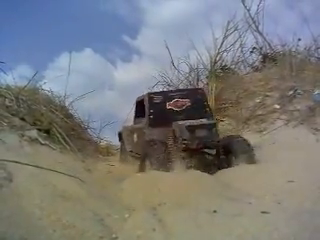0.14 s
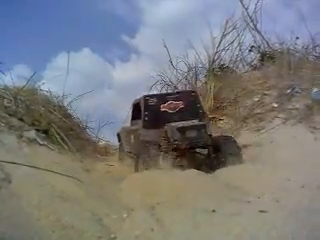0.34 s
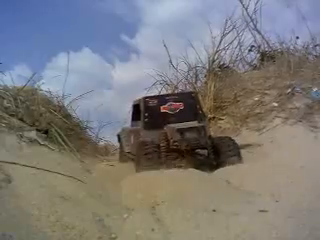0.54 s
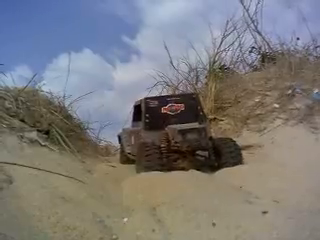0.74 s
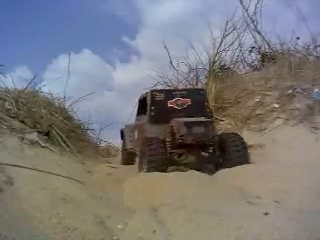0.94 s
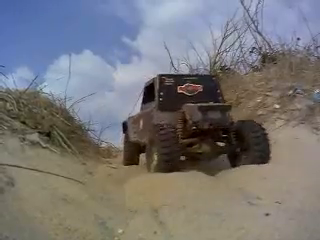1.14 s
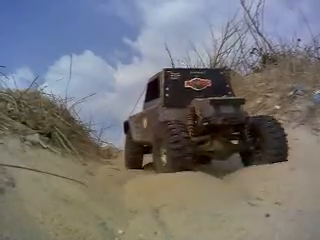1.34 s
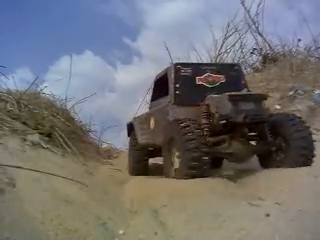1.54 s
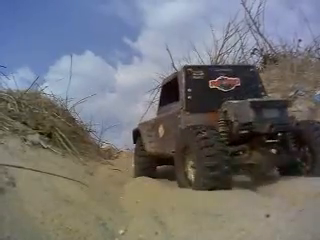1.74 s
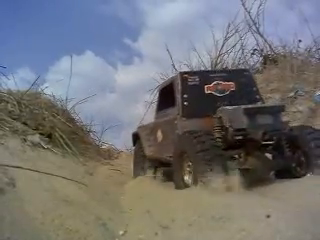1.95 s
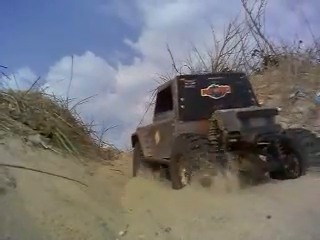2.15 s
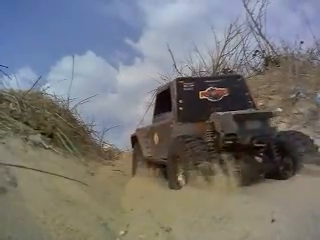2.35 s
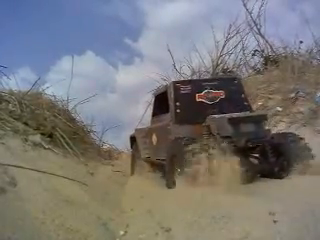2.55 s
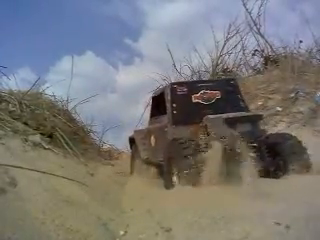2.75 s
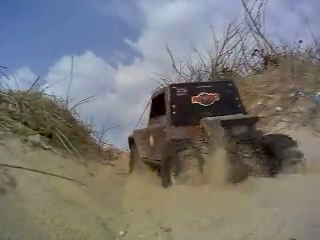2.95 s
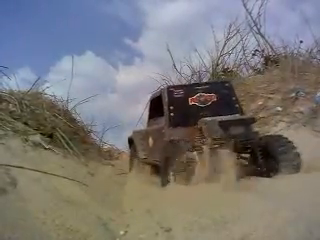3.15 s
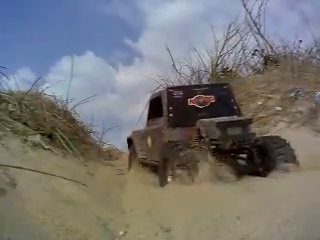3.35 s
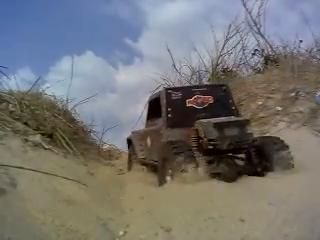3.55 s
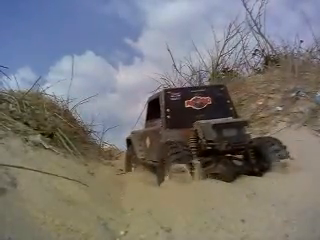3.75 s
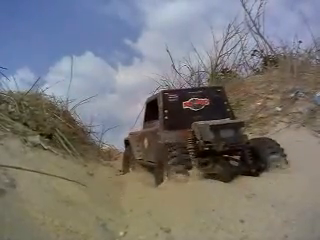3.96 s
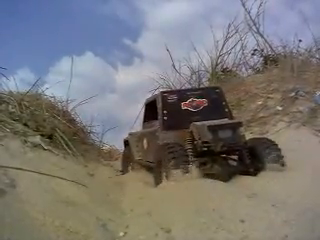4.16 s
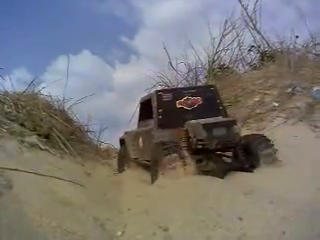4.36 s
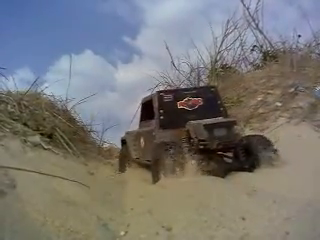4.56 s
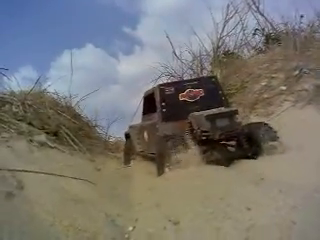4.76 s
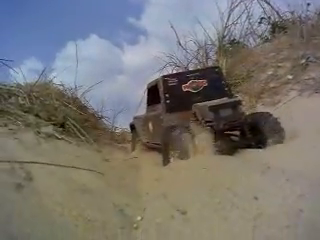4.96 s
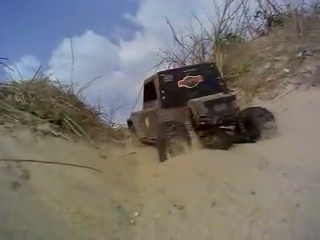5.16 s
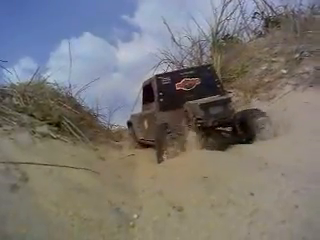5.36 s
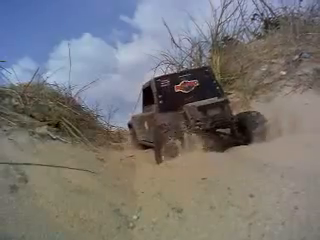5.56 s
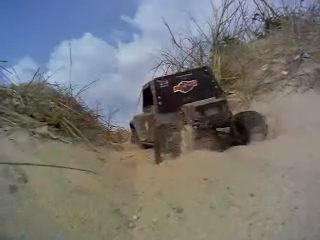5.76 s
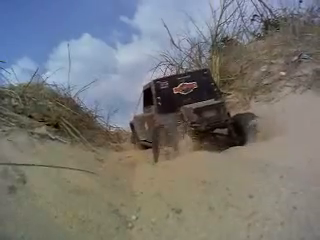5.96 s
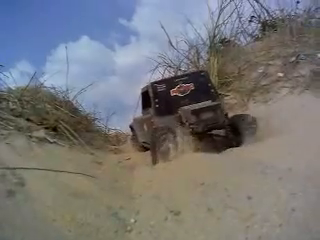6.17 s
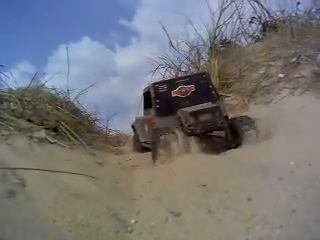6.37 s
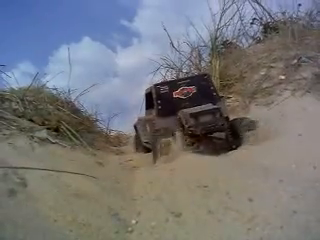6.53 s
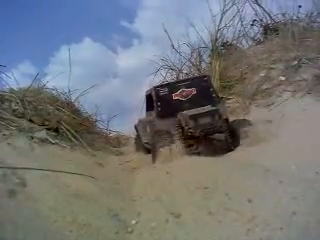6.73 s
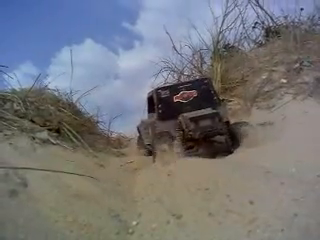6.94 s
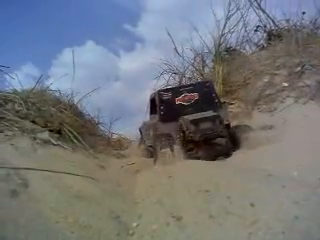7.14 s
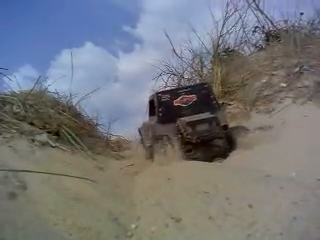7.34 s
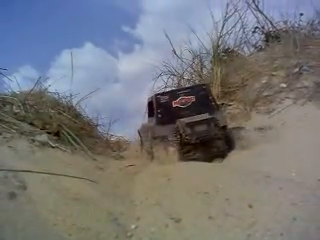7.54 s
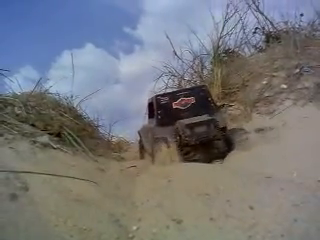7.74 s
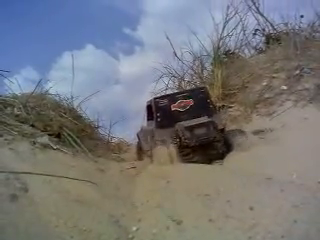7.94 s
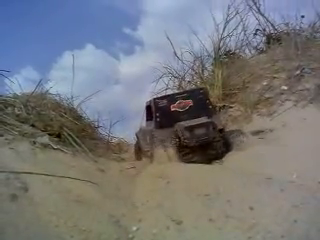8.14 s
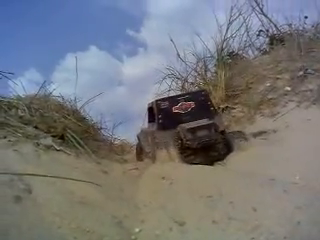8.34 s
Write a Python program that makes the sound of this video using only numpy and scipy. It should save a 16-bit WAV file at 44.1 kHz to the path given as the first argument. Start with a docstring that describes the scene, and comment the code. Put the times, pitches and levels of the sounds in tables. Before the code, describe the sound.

Close by on a breezy sand dune, a toy truck's electric motor revs up sharply and winds down. After a lull with short nudges, it settles into a raspy, rapidly pulsing whine as the tyres dig in and fling sand. The pitch sags under load and recovers, with gear teeth clattering at the strongest surges. Occasional small knocks and low wind puffs on the microphone come through.

```python
"""Toy truck climbing a dune

A small electric radio-controlled truck lunges, creeps, then digs in with spinning tyres, close to a
microphone in a sea breeze. Its drive-shaft joints make the gear whine warble about twelve times a
second. Gear teeth rattle in the plastic body and skip at the top of the widest surges. Sand sprays."""
import sys
import numpy as np
from scipy import signal
from scipy.fft import rfft, irfft
from scipy.io import wavfile
from scipy.ndimage import uniform_filter1d

SR = 44100
rng = np.random.default_rng(int(sys.argv[2]) if len(sys.argv) > 2 else 0)


def store_wav(level_fs):
    """Save 16-bit WAV to argv[1]."""
    pcm = np.round(np.clip(np.atleast_2d(level_fs), -1, 1) * 32767)
    wavfile.write(sys.argv[1], SR, pcm.T.astype(np.int16))


N = 374850
TIME = np.arange(N) / SR

# The "mesh rate" is how many gear teeth meet each second: it sets the pitch of the whine.
CREEP_HZ, BOGGED_HZ, CRUISE_HZ = 740, 1000, 1300
WIDE_SWING = .12  # beyond this speed swing (share of the mean) the wound-up shaft springs back

# where the gearbox and plastic body ring: (pitch [Hz], width [Hz], level [dB])
BODY_RESONANCES = [(375.4, 120, -6), (723, 160, -3), (958, 186, -1.5), (1090, 122, -5.5), (1330, 250, -9),
                   (1750, 380, -13), (2125, 140, -10), (2697, 570, -8.5), (3170, 180, -8),
                   (3620, 1300, -10.5), (4180, 770, -14), (5170, 1000, -9)]
# the tone of sand hitting tyres and body: (frequency [Hz], relative level [dB])
SAND_SPECTRUM = [(300, -9), (650, 3), (900, 6), (1480, -4), (1750, 1), (2400, -2.5), (2700, -0.5),
                 (2950, -4), (3250, 2.5), (4100, -0.5), (4750, -7.5), (5300, -5), (6300, -13), (7300, -23)]
# spinning wheels: (time [s], mean mesh rate [Hz], speed swing from the joints [share of the mean])
WHEELSPIN = [(1.92, 606, 0.03), (2.08, 1172, 0.082), (2.3, 1245, 0.088), (2.55, 1323, 0.09),
             (2.75, 1442, 0.18), (3.15, 1300, 0.22), (3.45, 1320, 0.15), (3.58, 1091, 0.01),
             (3.7, 975, 0.1), (4.1, 1025, 0.073), (4.43, 1006, 0.097), (4.58, 1204, 0.114),
             (4.76, 1227, 0.016), (4.92, 1259, 0.167), (5.1, 1252, 0.082), (5.26, 1300, 0.016),
             (5.45, 1376, 0.175), (5.75, 1290, 0.24), (6.45, 1393, 0.18), (6.75, 1311, 0.14),
             (7.2, 1306, 0.135), (7.7, 1358, 0.115), (8.5, 1305, 0.125)]
# dabs of throttle while creeping: (start [s], length [s], peak mesh rate [Hz], level [dB])
THROTTLE_DABS = [(0.974, .105, 1082, 3), (1.03, .25, 879.7, -3), (1.536, .1, 950, -9)]


def undb(db):
    """Turn decibels into a gain."""
    return 10 ** (np.asarray(db) / 20)


def unit(x):
    """Scale a signal to an average (rms) level of 1."""
    return x / np.sqrt(np.mean(x ** 2))


def curves(table):
    """Join a table's timed rows with straight lines: one curve for each later column."""
    times, *columns = np.transpose(table)
    return [np.interp(TIME, times, column) for column in columns]


def swells(rows):
    """A decibel curve of bell-shaped rises and dips."""
    return sum(db * np.exp(-((TIME - s) / half_s) ** 2) for s, half_s, db in rows)


def wander(rate):
    """A smooth random wobble of size about 1, changing about `rate` times a second."""
    span = max(int(SR / rate), 2)
    smoothed = uniform_filter1d(rng.standard_normal(N), span, mode="wrap")
    return unit(uniform_filter1d(smoothed, span // 2, mode="wrap"))


def colour(x, points):
    """Shape a sound's tone by (frequency [Hz], level [dB]) points, then scale it to level 1."""
    hz, db = np.transpose(points)
    freqs = np.maximum(np.arange(N // 2 + 1) * SR / N, 1)
    gain = undb(np.interp(np.log(freqs), np.log(hz), db))
    return unit(irfft(rfft(x) * gain, N))


def ring(x, resonances):
    """Pass a sound through resonances: (pitch [Hz], width [Hz], level [dB])."""
    freqs = np.arange(N // 2 + 1) * SR / N
    power = sum((undb(db) / (1 + (2 * (freqs - hz) / width) ** 2)) ** 2 for hz, width, db in resonances)
    return irfft(rfft(x) * np.sqrt(power), N)


def grains(per_second, spread_db):
    """Tiny impacts at random times; a larger spread makes their sizes more unequal."""
    hits = rng.random(N) < per_second / SR
    return hits * rng.standard_normal(N) * undb(spread_db * rng.standard_normal(N))


def wind(level_db=-40, buffet_db=1.58):
    """Swirls of air buffet the microphone, with a few stronger puffs."""
    # the tone of wind on the microphone: (frequency [Hz], relative level [dB])
    spectrum = [(15, -9), (30, -2), (55, 3), (80, 1), (120, -2), (170, -4.5), (250, -11.5), (370, -16.5),
                (500, -21.5), (800, -24), (1500, -29.5), (3300, -33), (4500, -43), (7300, -50.5)]
    # the strongest gusts, and a lull: (time [s], half length [s], level change [dB])
    puffs = [(1.05, 0.041, 2.5), (1.45, 0.29, -1), (1.94, 0.021, 6), (2.15, 0.097, 5.5), (3.51, 0.037, 7.5),
             (4.1, 0.17, 4), (4.91, 0.033, 6.5), (5.3, 0.085, 4), (5.56, 0.056, 5), (6.27, 0.032, 9),
             (6.9, 0.13, 3.5), (7.38, 0.029, 3.5), (8.4, .035, 6)]
    rush = colour(rng.standard_normal(N), spectrum)
    return rush * undb(level_db + swells(puffs) + buffet_db * wander(10))


def knocks(rise_s=.0019, decay_s=.0071):
    """Grit and loose links knock in short bursts that partly ring the body."""
    # knocks on the truck: (time [s], peak level [dB], share that rings the body [0-1])
    strikes = [(.38, -33, .8), (.428, -31.5, .95), (.485, -35, .7), (.948, -52, .5), (1.04, -44, .8),
               (1.066, -44, .85), (1.548, -53, .35), (1.789, -49, .1), (2.429, -40, .6), (2.759, -38, .45),
               (3.351, -42, .6), (4.913, -43, .5), (5.67, -43, .6), (6.274, -41, .7), (6.789, -43, .6)]
    ringing, plain = np.zeros((2, N))
    for s, db, share in strikes:
        age = TIME - s
        burst = undb(db) * np.clip(age / rise_s, 0, 1) * np.exp(-np.abs(age) / decay_s)
        ringing += share * burst
        plain += (1 - share) * burst
    noise = rng.standard_normal(N)
    crunch = colour(noise, [(400, -2), (1500, -1), (3000, -5), (5000, 0), (7300, -7)])
    return ringing * unit(ring(noise, BODY_RESONANCES)) + plain * crunch


def tyres(octaves, level_db=-49, dig_db_per_s=.09):
    """Rubber treads churn the sand with a low rumble that grows as they dig deeper."""
    spectrum = [(60, -16), (150, 4.5), (260, 1), (380, -4.5), (520, -5.5), (900, -36.5), (3000, -61.5)]
    rumble = colour(grains(600, spread_db=0), spectrum)
    return rumble * undb(level_db + octaves + dig_db_per_s * TIME)  # 1 dB more per doubling of speed


def sand_hiss(joint, throb_db=.26, flutter_db=1.5, lag_rad=1):
    """Treads fling grit and fine sand in spurts that follow the wheels' surges."""
    grit = unit(grains(7000, spread_db=2.2))
    hiss = undb(-3) * rng.standard_normal(N)
    fling = np.cos(joint - lag_rad) + .5 * np.cos(2 * (joint - lag_rad))
    return colour(grit + hiss, SAND_SPECTRUM) * undb(throb_db * fling + flutter_db * wander(60))


def sand_ticks(joint, per_second=200, volley_db=4, lag_rad=1.1):
    """Coarse grains hit the body in a volley just after each surge."""
    hits = (rng.random(N) < per_second / SR) * undb(2 * rng.standard_normal(N))
    ticks = colour(hits, [(100, -25), (700, -4), (1500, 0), (4000, 0), (5500, -7), (7300, -20)])
    return ticks * undb(volley_db * np.cos(joint - lag_rad))


def sand_spray(joint, octaves, db_per_octave=8.5):
    """Faster treads throw sand harder, so its hiss and ticks grow together."""
    # the treads reach patches of loose sand: (time [s], half length [s], level change [dB])
    patches = [(.25, 0.084, 1), (2.7, 0.15, -0.3), (5.33, 0.075, 3.5)]
    spray = undb(-48) * sand_hiss(joint) + undb(-60) * sand_ticks(joint)
    return spray * undb(db_per_octave * octaves + swells(patches))


def press(start, end, attack_s=.075, release_s=.033):
    """One press of the throttle, from 0 to 1: a quick rise, a hold and a run-down."""
    return np.clip((TIME - start) / attack_s, 0, 1) * np.exp(-np.maximum(TIME - end, 0) / release_s)


def throttle(lunge_s=(.028, .712), spin_start_s=1.937, slack_s=.074):
    """The drive reaching the wheels, and a brief pulse as each press takes up the gears' slack."""
    presses = [(*lunge_s, 0), (spin_start_s, TIME[-1], 0)]
    presses += [(s, s + length, db) for s, length, _, db in THROTTLE_DABS]
    drives = [undb(db) * press(start, end) for start, end, db in presses]
    pulses = [press(start, end) * np.exp(-np.abs(TIME - start) / slack_s) for start, end, _ in presses]
    return np.max(drives, axis=0), np.max(pulses, axis=0)


def speed():
    """Mean mesh rate and its swing: a lunge, nudges over a slow creep, then wheelspin."""
    # the opening lunge: (time [s], mean mesh rate [Hz])
    lunge = [(0, 720), (.09, 1290), (.16, 1260), (.187, 1410), (.2, 1590), (.225, 1700), (.247, 1560),
             (.275, 2130), (.29, 2200), (.302, 1950), (.38, 2690), (.45, 2690), (.49, 2400), (.53, 2150),
             (.55, 1830), (.578, 1770), (.6, 1460), (.66, 1380), (.69, 980), (.75, 720)]
    lunge_hz, = curves(lunge)
    spin_hz, swing = curves(WHEELSPIN)
    dabs_hz = [CREEP_HZ + (hz - CREEP_HZ) * press(s, s + length) for s, length, hz, _ in THROTTLE_DABS]
    early_hz = np.max([lunge_hz, *dabs_hz], axis=0)
    return np.where(TIME < WHEELSPIN[0][0], early_hz, spin_hz), swing


def motor_load(mesh_hz):
    """How hard the motor labours: 0 at cruising speed, 1 when bogged down."""
    return np.clip((CRUISE_HZ - mesh_hz) / (CRUISE_HZ - BOGGED_HZ), 0, 1)


def drive_shaft(mean_hz, swing, teeth_per_swing=113.5, limp_rad=.85):
    """Angled joints speed and slow the motor. Gives mesh rate, teeth met so far and joint angle."""
    swings = np.cumsum(mean_hz) / SR / teeth_per_swing
    joint = 2 * np.pi * (.037 + swings - np.interp(WHEELSPIN[0][0], TIME, swings))
    load = motor_load(mean_hz)
    joint += load * limp_rad * np.cos(joint / 2 + .42)  # a loaded shaft binds once a turn and limps
    rebound = .5 * np.clip((swing - WIDE_SWING) / .1, 0, 1)
    surge_shape = np.cos(joint) + (rebound - .25 * load) * np.cos(2 * joint)  # load flattens each surge
    surge = swing * (1 + .11 * wander(12)) * surge_shape
    grab = (.011 + .004 * load) * wander(70)  # the treads grab and slip
    bounce = (.003 + .008 * swing) * wander(260)  # bouncing teeth turn the tone to a rasp
    mesh_hz = mean_hz * (1 + surge + grab + bounce)
    return mesh_hz, np.cumsum(mesh_hz) / SR, joint


def rattle(teeth):
    """The gears have slack, so each tooth lands with a dull scrape of its own strength."""
    strength = undb(1.5 * wander(260))
    scrape = np.exp(-(teeth % 1) / .33) * rng.standard_normal(N) * strength
    spectrum = [(400, -3), (650, -3.5), (900, 5), (1100, 1.5), (1300, -4), (1800, -3.5),
                (2700, -17), (5000, -22.5)]
    return colour(ring(scrape, BODY_RESONANCES), spectrum)


def clatter(teeth):
    """Skipping teeth land as sharp, unequal blows that ring the gearbox."""
    # where the struck gearbox rings: (pitch [Hz], width [Hz], level [dB])
    gearbox_resonances = [(830, 90, 3), (1730, 70, -5), (2680, 120, -13), (3250, 90, 0), (5170, 120, -12)]
    landings = np.diff(np.floor(teeth), prepend=0)
    blows = landings * rng.standard_normal(N) * undb(1.5 * rng.standard_normal(N))
    ringing = sum(undb(db) * signal.lfilter(*signal.iirpeak(hz, hz / width, fs=SR), blows)
                  for hz, width, db in gearbox_resonances)
    return unit(ringing) + .2 * colour(blows, SAND_SPECTRUM)


def growl(teeth, mount_hz=820, width_hz=140, db=-2.5):
    """Twice a turn the motor tugs unevenly at its mount, which growls at the top of each fast surge."""
    tug = np.sin(np.pi * teeth + .7 * wander(220))
    strength = undb(1.2 * wander(14) + 3 * wander(160))
    return ring(unit(tug * strength), [(mount_hz, width_hz, db)])


def whine(mesh_hz, teeth, bite_db):
    """Meshing teeth make tones that sweep through the body's resonances, shaken by the load."""
    # gear tones; 4 is the mesh, and 3.65 beats against it: (rate [cycles per motor turn], level [dB])
    gear_tones = [(1, -.5), (3, -5.5), (3.65, -7), (4, 1.3), (5, -7), (6, -7.5), (7, -8.5), (8, -1.5),
                  (10, -13), (12, -2), (16, -15)]
    # changing boosts of the first three mesh harmonics: (time [s], first [dB], second [dB], third [dB])
    mesh_boosts = [(.08, -3, -3, -4), (.14, -3, 5, 0), (.25, -2, 2, -6), (.28, 0, 0, -9), (.305, 0, 4, -9),
                   (.35, -1, -4, -10), (.385, 4, -5, -10), (.41, 0, -6, -10), (.44, 7, -6, -10),
                   (.5, -1, -2, -10), (.56, -2, 7, -10), (.59, -2, 5, -10), (.65, -1, -1, -9),
                   (.7, 3, -4, -9), (1.1, 3, -5, -9), (2.1, 3, 2, 2), (2.5, 0, 3, -1), (3.2, 2, 0, -1),
                   (3.6, 2, -1, .5), (4.4, 2, -1, .5), (4.75, 5, -1, .5), (4.95, 2.5, -.5, 1),
                   (5.25, 3.5, 1, 1.5), (5.7, 0, 0, -1), (6.4, -.5, 0, -1), (6.9, -1, .5, 2),
                   (7.7, -3, .5, 2), (8.5, -3, .5, 2.5)]
    boost_db = dict(zip((4, 8, 12), curves(mesh_boosts)))
    soften_db = 4 * np.minimum(np.log2(mesh_hz / CRUISE_HZ), 0)  # slow teeth land softly: less treble
    labour = 1 + .45 * motor_load(mesh_hz)
    jitter = .027 * labour * wander(330)  # from the slack between the teeth
    motor_angle = np.pi / 2 * teeth + jitter  # four teeth to a turn
    force = 0
    for cycles, db in gear_tones:
        octaves_above_mesh = max(np.log2(cycles) - 2, 0)
        gain = undb(db + boost_db.get(cycles, 0) + (soften_db + bite_db) * octaves_above_mesh)
        shake = 1 + labour * (.32 * wander(80) + .29 * wander(350))
        tone = np.sin(cycles * motor_angle + 2 * np.pi * rng.random())
        force += gain * unit(shake * tone)
    return ring(force, BODY_RESONANCES)


def motor(mesh_hz, teeth, joint, swing, skip, strain_db=.34, catch_db=1.84):
    """Whine and growl together: teeth press hardest while the shaft slows, and catch unevenly."""
    # the tyres bog down and load the teeth: (time [s], half length [s], level rise [dB])
    bogs = [(3.6, 0.17, 3.7), (4.3, 0.5, 3), (5.28, 0.049, 3)]
    pressure_db = swells(bogs) + strain_db * np.cos(joint - 1) + catch_db * wander(39)
    # the overtones brighten while the shaft slows
    bite_db = 1.3 * np.minimum(swing / WIDE_SWING, 1) * np.cos(joint - 2.5)
    # skipping teeth weaken the whine and lift the growl
    tones = undb(-4.5 * skip) * whine(mesh_hz, teeth, bite_db)
    mount = undb(1.5 * skip) * growl(teeth)
    return undb(pressure_db) * (tones + mount)


def scene(loosen_s=.008):
    """Gears, sand and tyres follow the truck's throttle, speed and distance, under the wind."""
    # from truck to microphone: (time [s], distance [m])
    route = [(0, 0.68), (1.0, 1.27), (2.15, 0.63), (3.5, 0.91), (5.5, 0.99), (8.5, 1.08)]
    metres, = curves(route)
    drive, take_up = throttle()
    mean_hz, swing = speed()
    mesh_hz, teeth, joint = drive_shaft(mean_hz, swing)
    octaves = np.log2(mean_hz / CRUISE_HZ)  # doublings of speed; each makes the truck louder
    overshoot = mesh_hz / mean_hz - 1
    skip = np.clip((overshoot - .125) / .1, 0, 1)  # teeth start to skip 12.5% above the mean speed
    gears = undb(-43.2 + 6.5 * octaves) * motor(mesh_hz, teeth, joint, swing, skip)
    gears += undb(-48.5 + 5.5 * octaves - .5 * take_up) * rattle(teeth)
    gears += undb(-45.5) * skip * clatter(teeth)
    spray = sand_spray(joint, octaves)
    # the treads need a moment to loosen the sand, so the spray starts just after the drive
    step = 1 / (loosen_s * SR)
    loosened = np.minimum(signal.lfilter([step], [1, step - 1], drive), drive)
    coasting, rolling = undb(-35), undb(-7.5)  # the gains that remain with the throttle off
    truck = np.maximum(drive, coasting) * gears
    truck += np.maximum(loosened, coasting) * spray
    truck += np.maximum(drive, rolling) * tyres(octaves)
    return (truck / metres + knocks() + wind())[None]


def record(dry, cutoff_hz=7350):
    """A steep low-pass filter removes the treble above about 7 kHz."""
    return signal.sosfilt(signal.ellip(12, .2, 80, cutoff_hz, fs=SR, output="sos"), dry)


dry = scene()
out = record(dry)
store_wav(out)
```